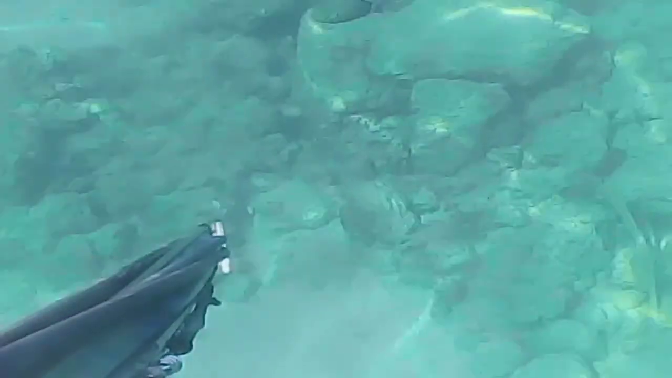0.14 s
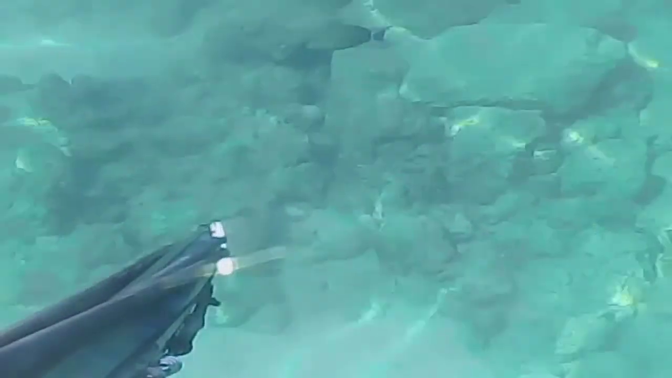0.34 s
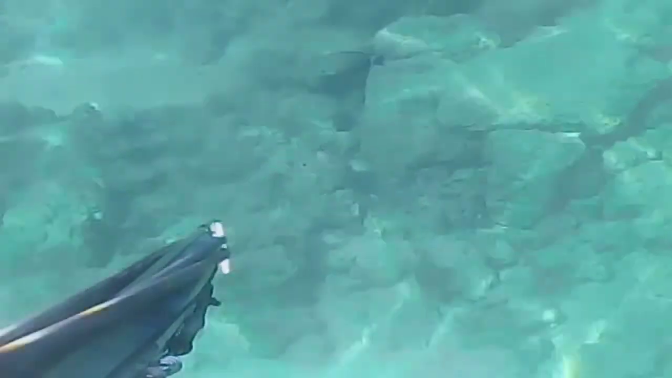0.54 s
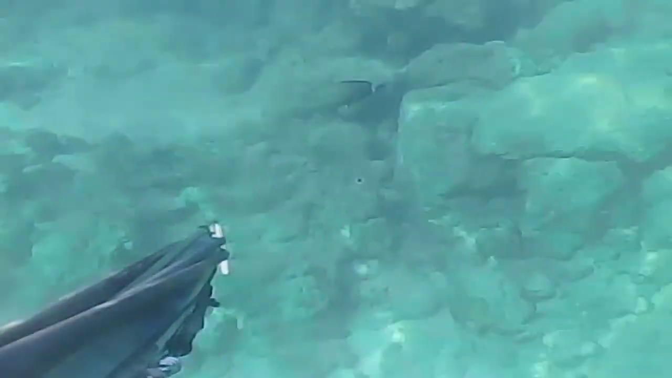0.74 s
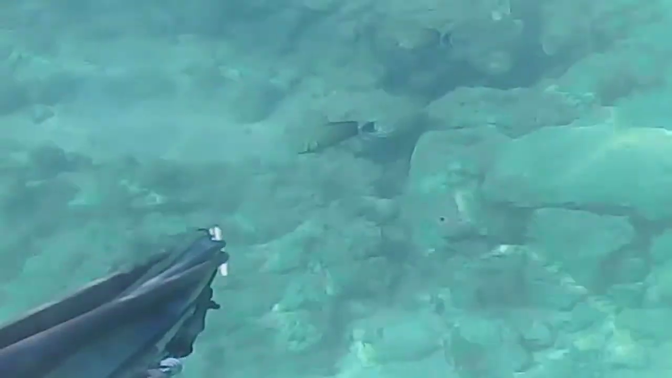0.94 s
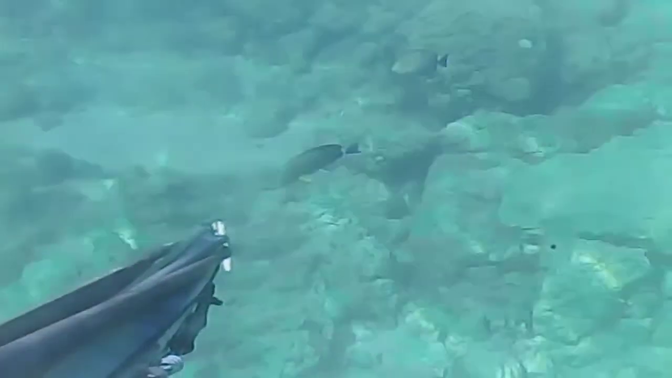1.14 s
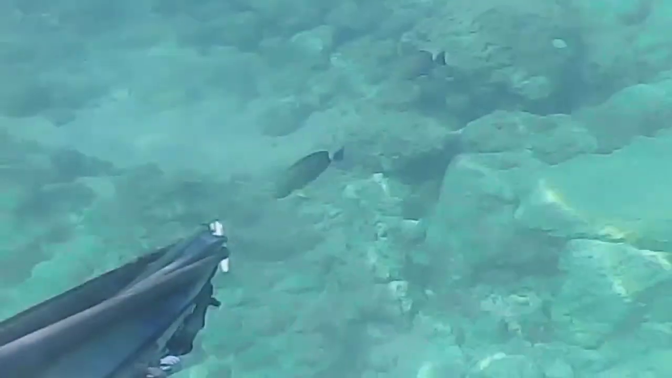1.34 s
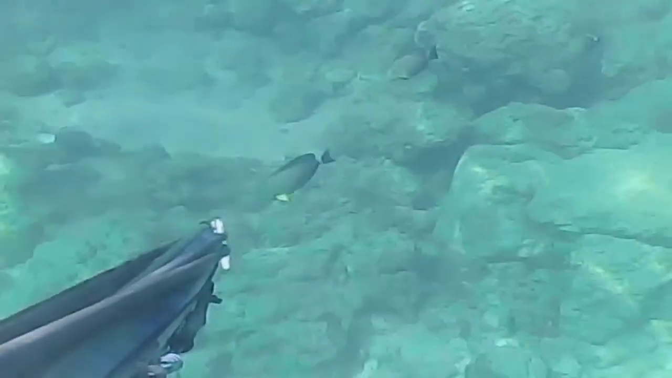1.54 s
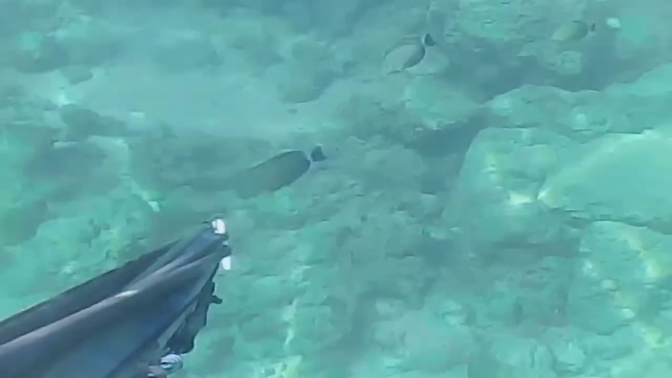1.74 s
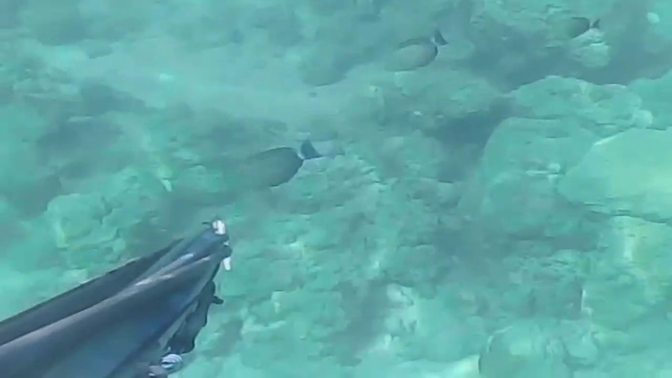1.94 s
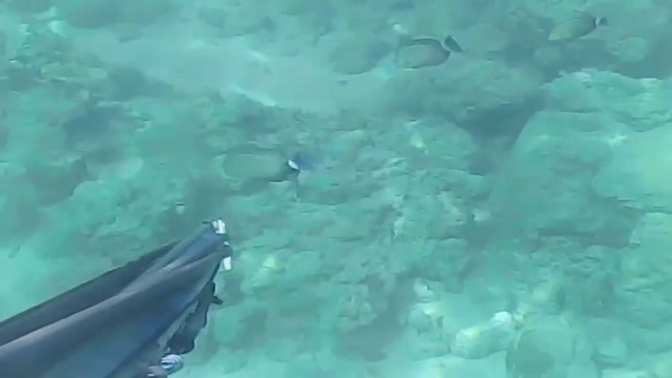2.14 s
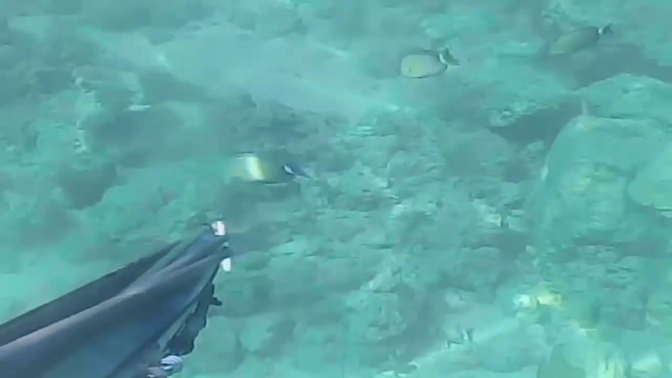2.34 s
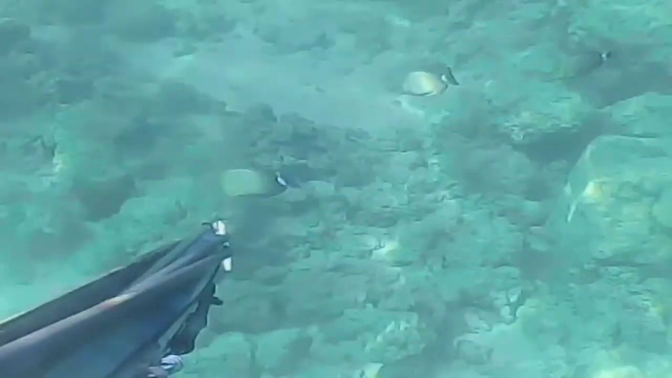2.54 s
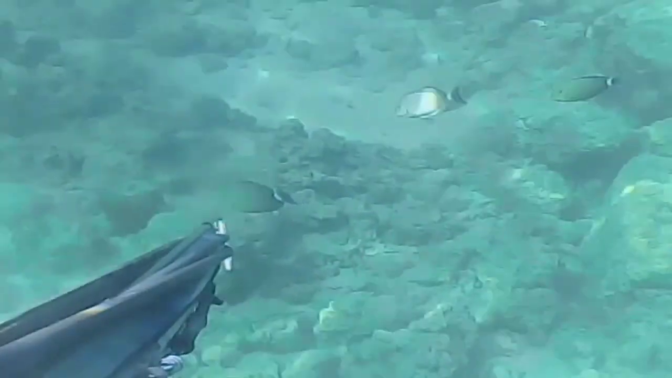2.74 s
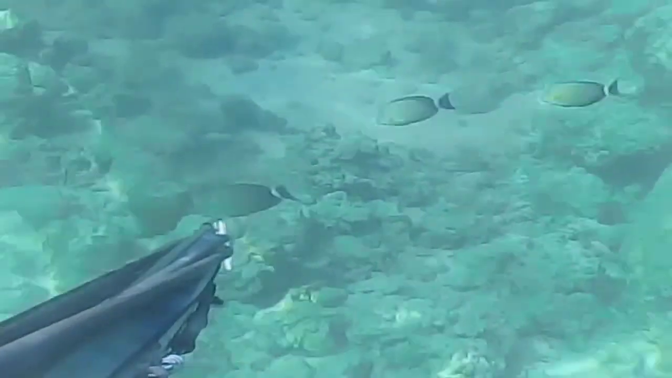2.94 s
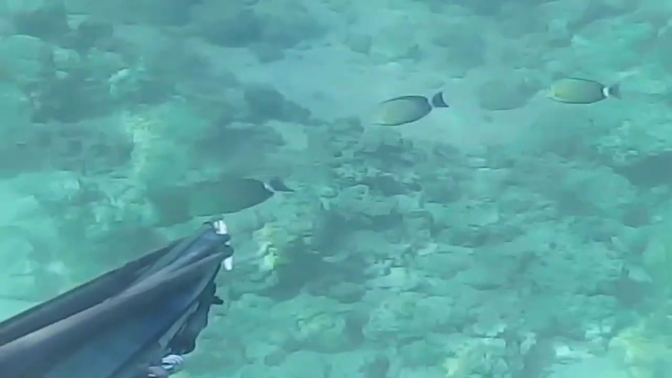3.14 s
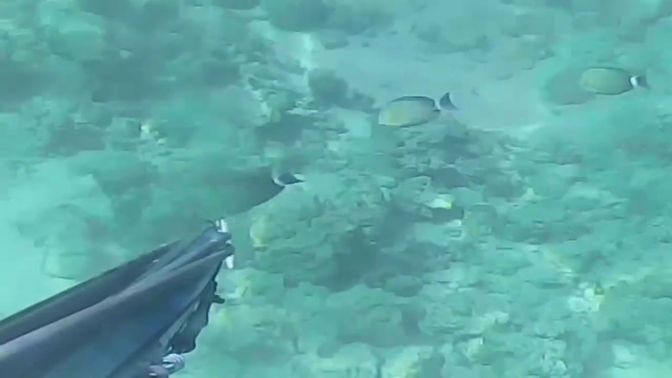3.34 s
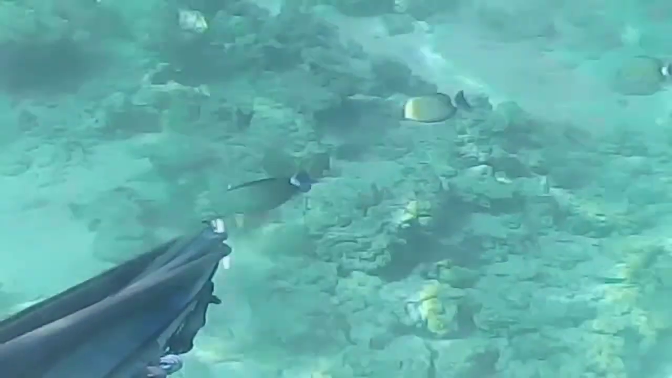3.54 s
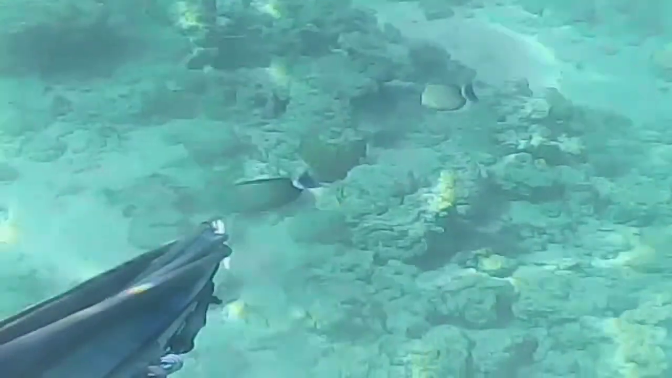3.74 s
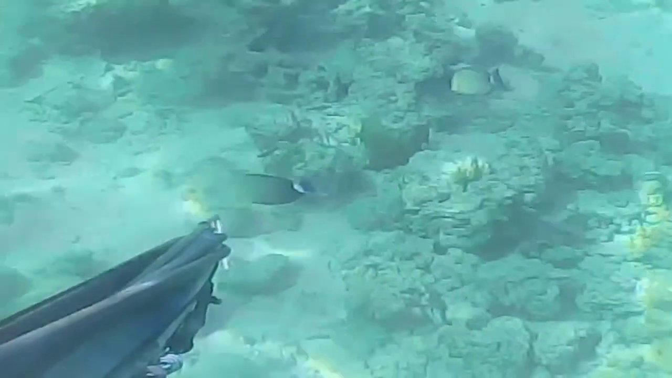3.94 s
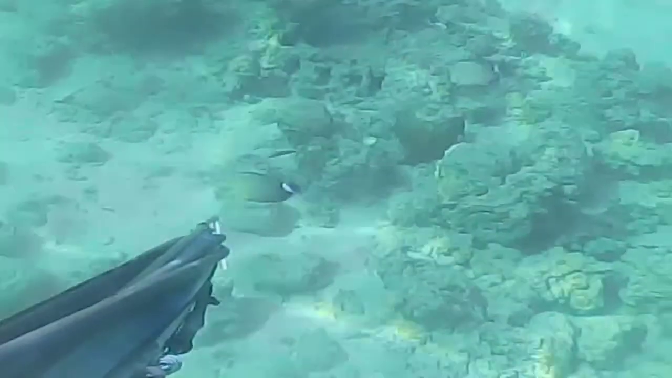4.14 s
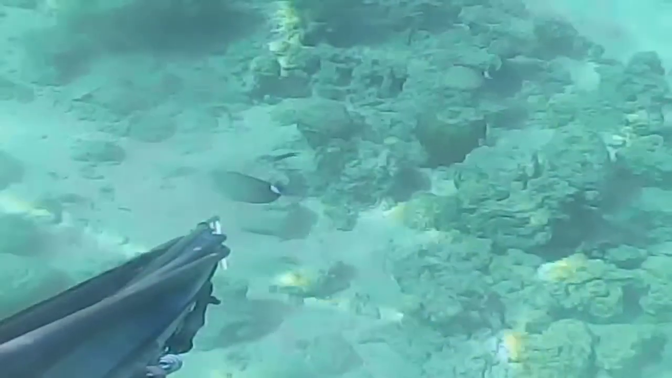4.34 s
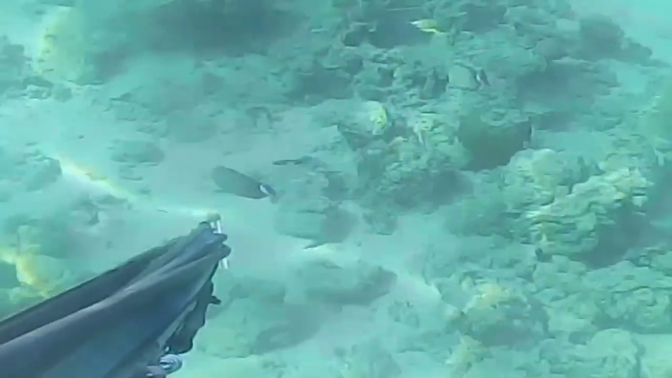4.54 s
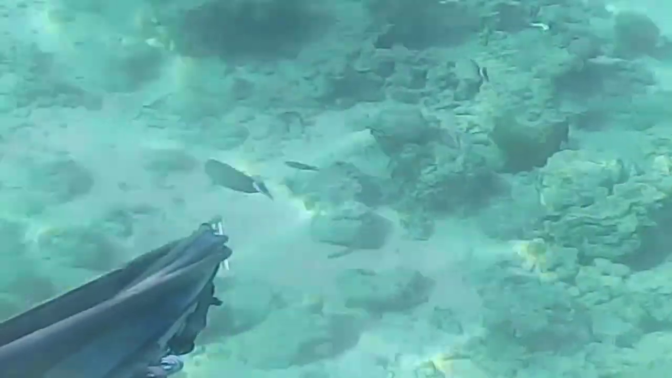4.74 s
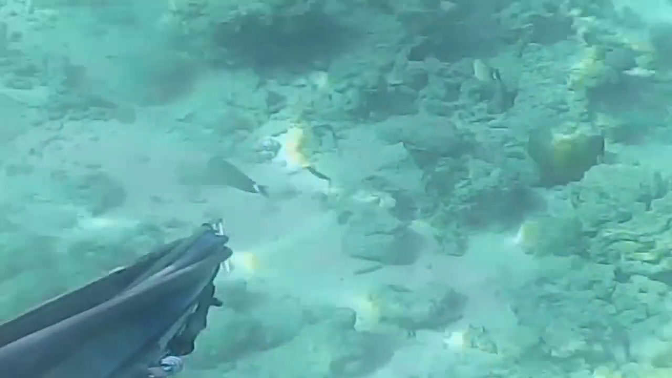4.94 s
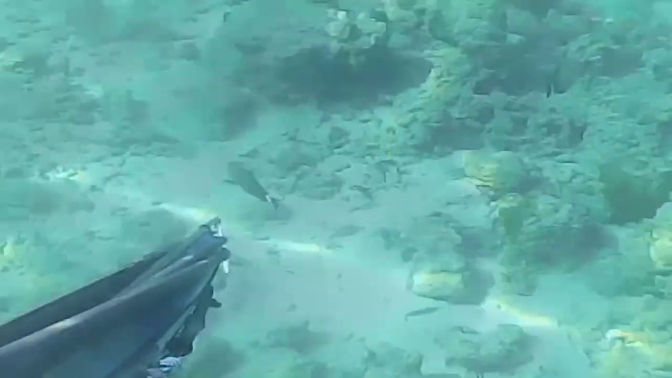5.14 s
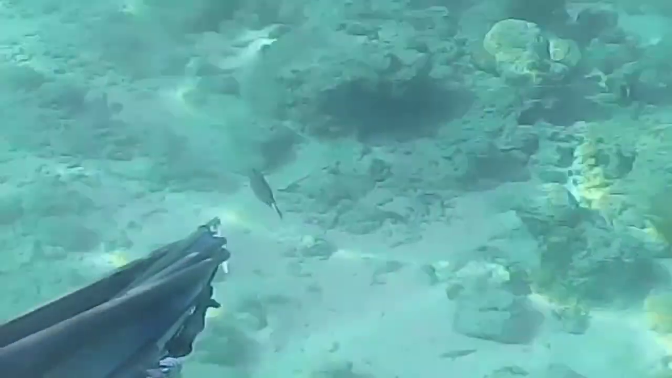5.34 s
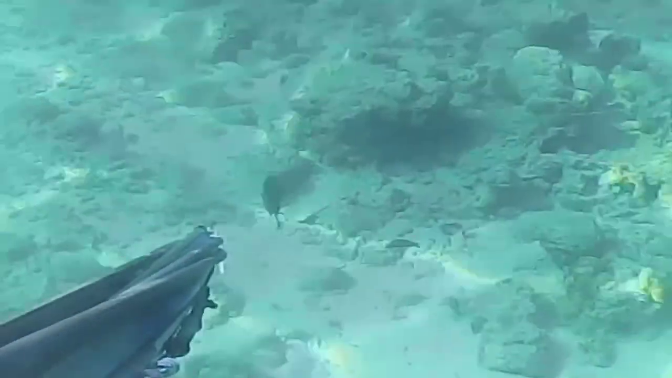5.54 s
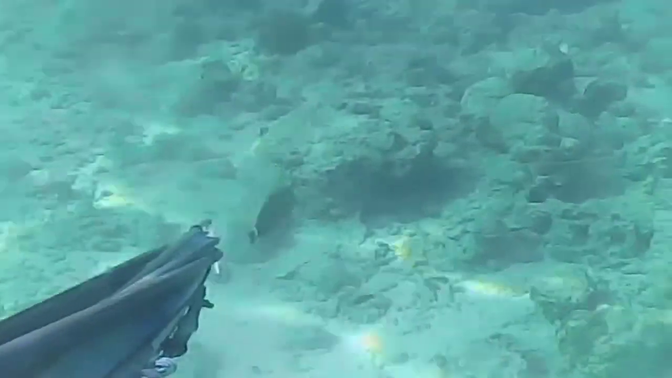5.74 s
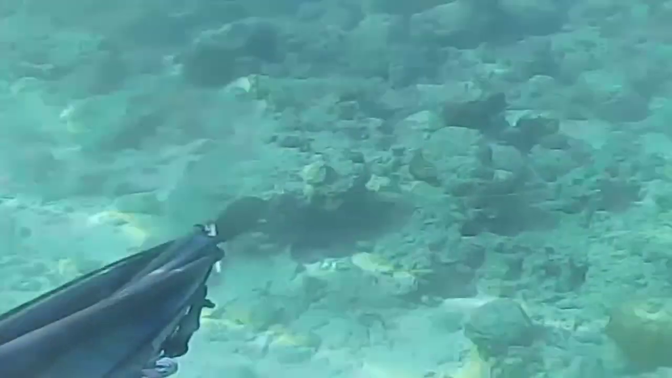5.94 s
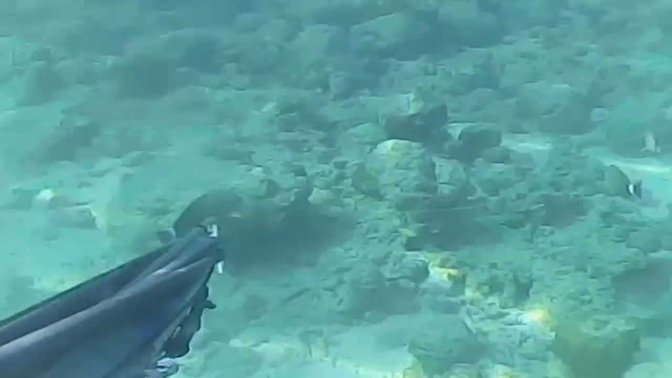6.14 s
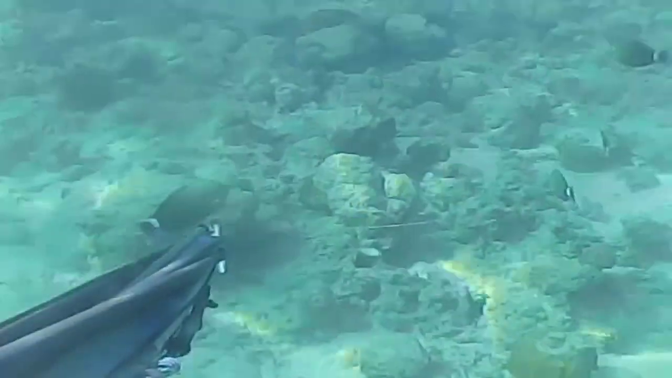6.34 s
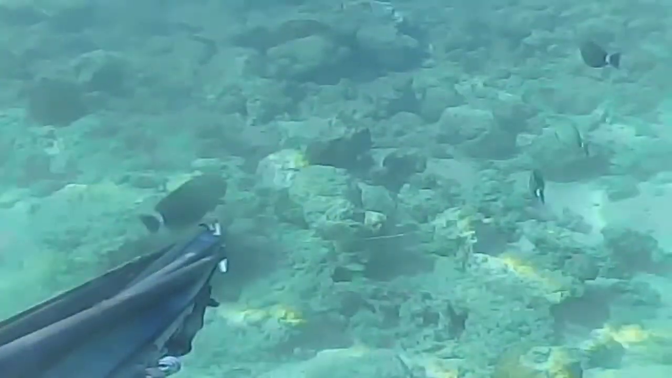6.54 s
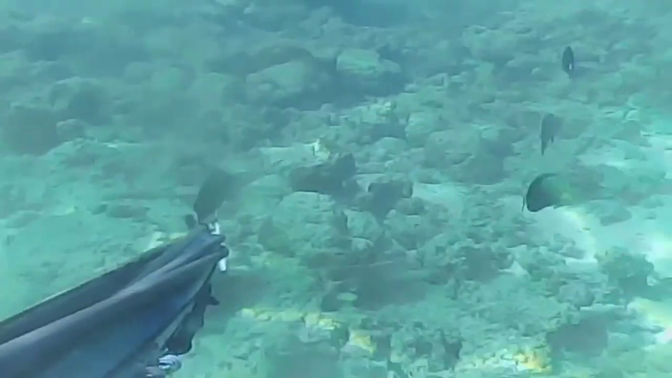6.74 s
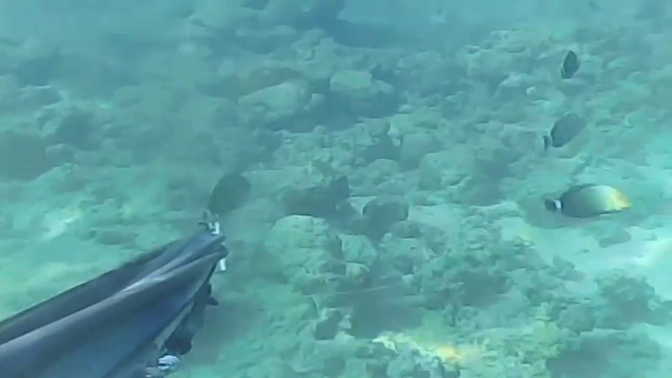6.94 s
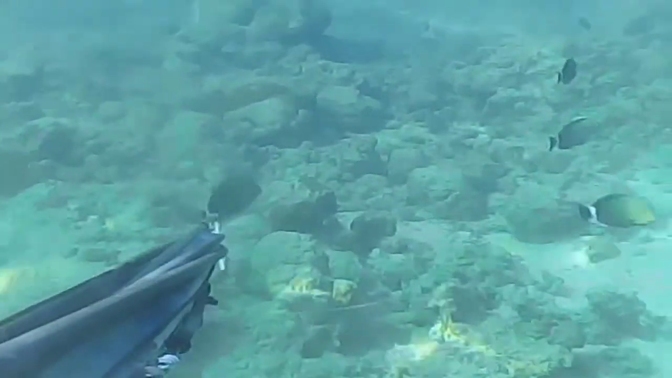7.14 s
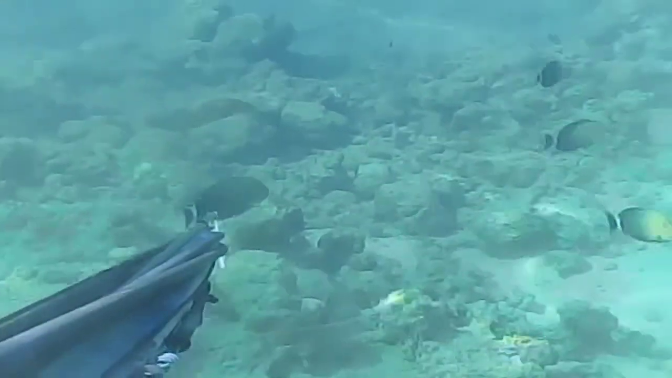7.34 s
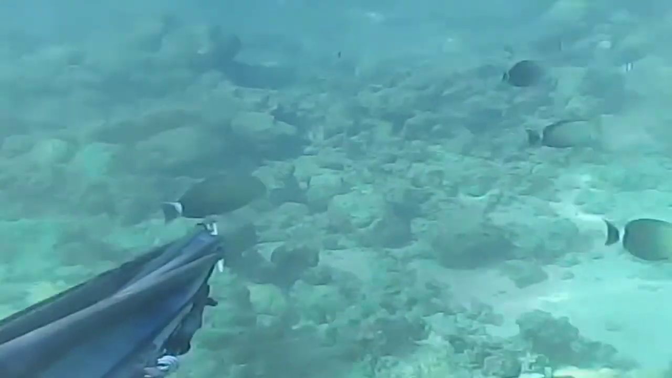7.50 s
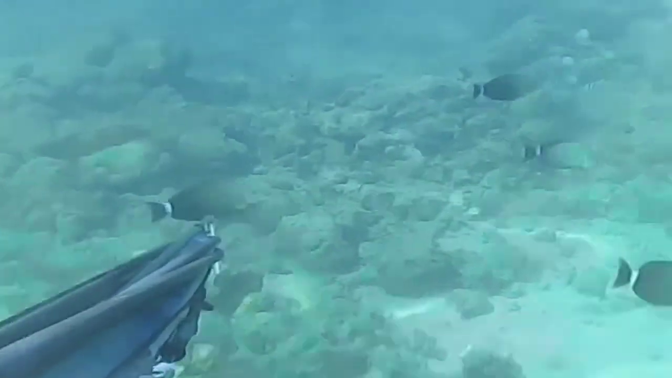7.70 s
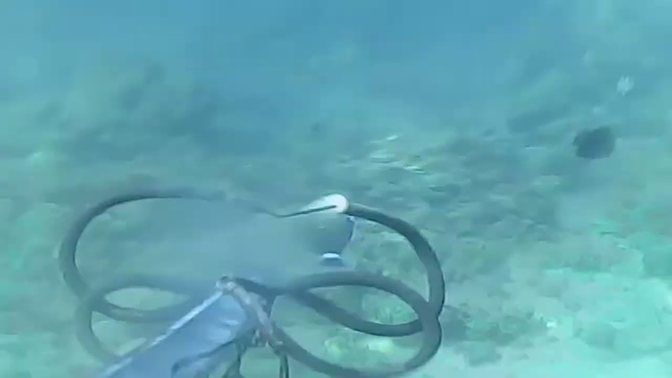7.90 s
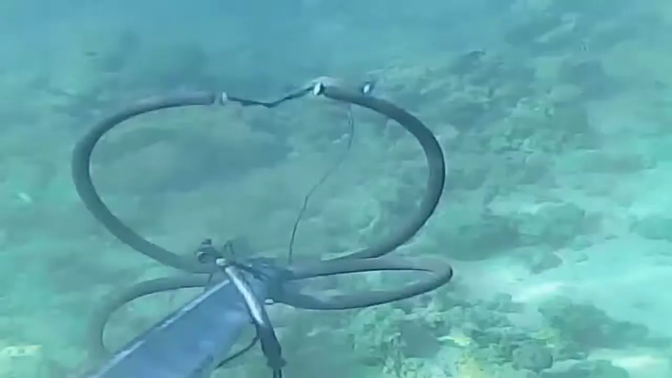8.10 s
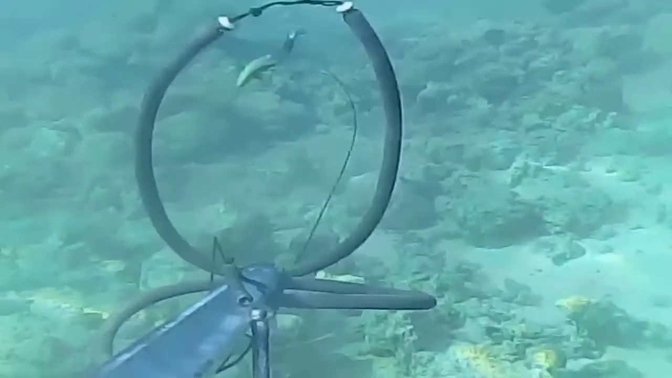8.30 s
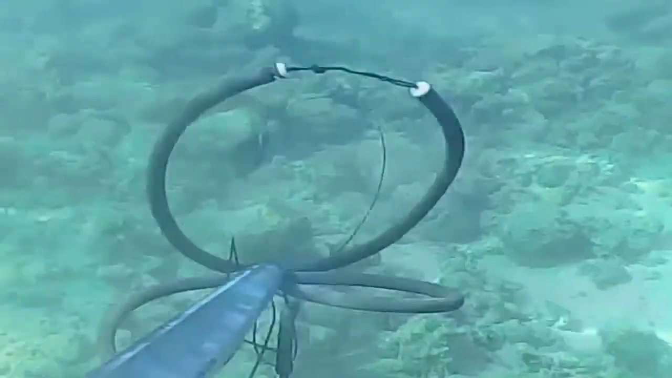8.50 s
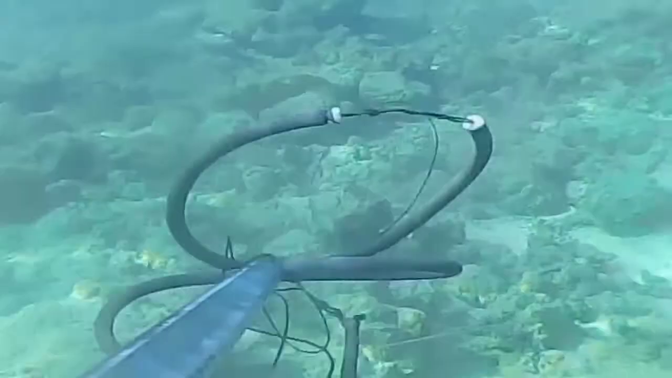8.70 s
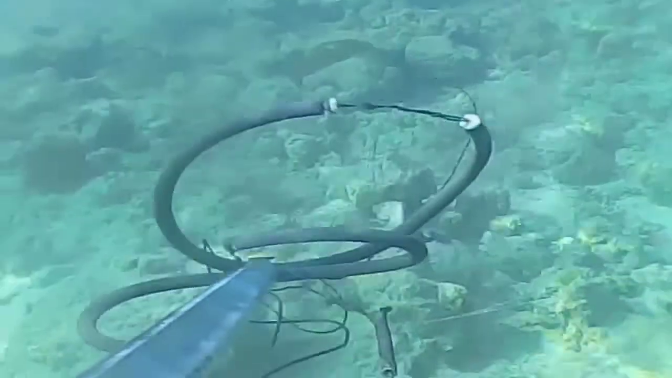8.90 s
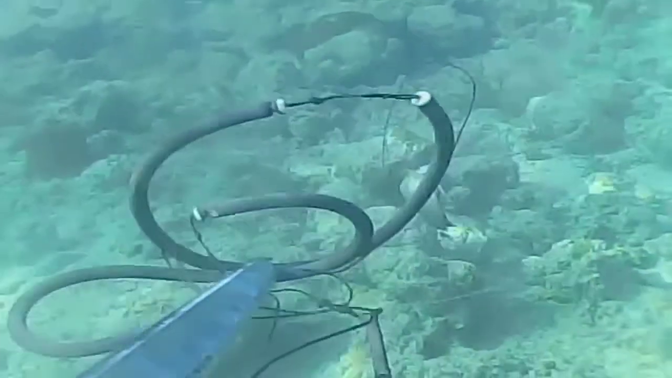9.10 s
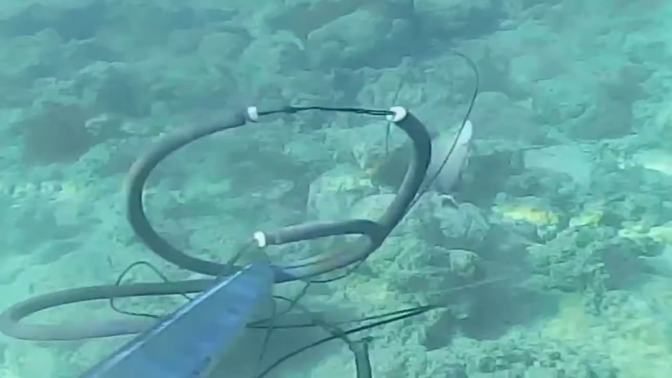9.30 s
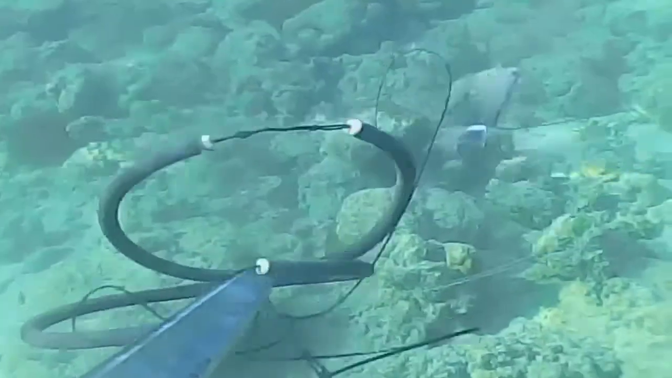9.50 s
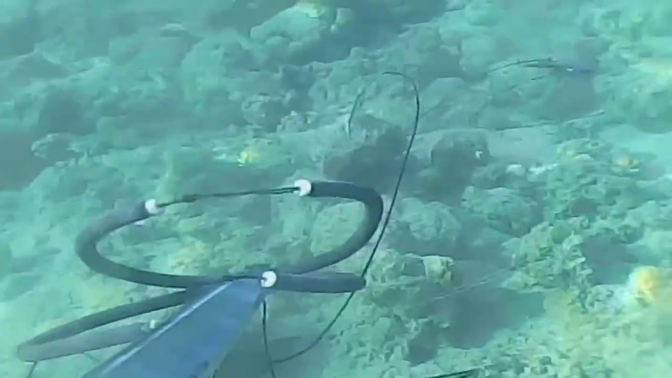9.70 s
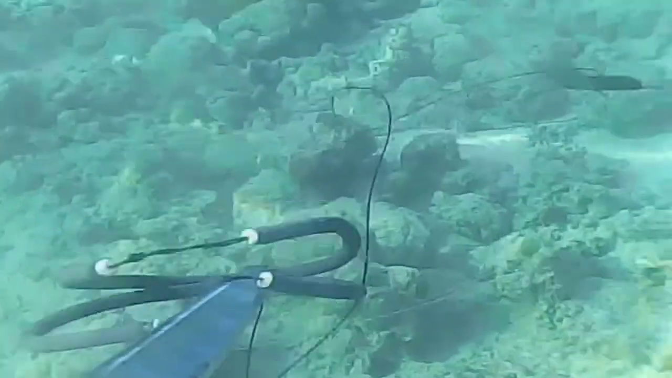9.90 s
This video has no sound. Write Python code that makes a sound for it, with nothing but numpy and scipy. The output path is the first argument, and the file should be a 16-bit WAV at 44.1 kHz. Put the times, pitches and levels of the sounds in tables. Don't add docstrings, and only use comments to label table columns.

```python
import sys
import numpy as np
from scipy import signal
from scipy.fft import rfft, irfft
from scipy.io import wavfile
from scipy.ndimage import map_coordinates

SR = 44100
rng = np.random.default_rng(int(sys.argv[2]) if len(sys.argv) > 2 else 0)


def gain_from_db(level_db):
    decades = np.asarray(level_db, float) / 20
    return 10 ** decades


def int16_out(signal):
    q = np.round(np.clip(np.atleast_2d(signal).T, -1, 1) * 32767)
    wavfile.write(sys.argv[1], SR, q.astype(np.int16))


N = 439236
T = np.arange(N) / SR

# [f/Hz, level/dB, t60/s]
BARREL_MODES = [(283.6, -17.5, 0.033), (385, -10, 0.039), (542.8, -0.5, 0.036), (653, -8.5, 0.051),
                (820, -13, 0.018), (1110, -12.5, .025), (1290, -15.5, 0.024), (1570, -18, 0.036),
                (1950, -17.5, .02), (2354, -16.5, .016), (2920, -21, 0.023)]
# [t/s, peak level/dB]
BLOWS = [(8.3668, -22.5), (8.3722, 17), (8.388, 3), (8.3948, 0), (8.4065, -2), (8.416, -5), (8.4236, -5.5),
         (8.434, -15.5), (8.445, -12), (8.458, -6), (8.472, -10), (8.488, -32), (8.506, -26.5),
         (8.521, -36), (8.644, -49), (8.66, -35.5)]
# [t/s, attack/s, hold/s, level/dB, release/(dB/s)]
RATTLE = [
    (8.33, 0.03, .002, -40, 907),
    (8.369, .004, 0.069, -10, 350),
    (8.5, 0.072, 0.2, -58, 254.5),
]
# [t/s, attack/s, hold/s, level/dB, release/(dB/s)]
RECOIL = [
    (8.385, 0.016, .068, -2, 1302),
    (8.44, .04, 0.025, -21, 89.5),
]
# [t/s, attack/s, hold/s, level/dB, release/(dB/s)]
WASH = [
    (8.372, .03, .06, -11, 302.5),
    (8.5, 0.061, 0.0092, -42.5, 48.5),
]
# [t/s, peak level/dB, f/Hz, brightness/dB, t60/s, body level/dB]
TRIGGER = (8.3445, -54, 1740, 10, .06, 16)
# [t/s, peak level/dB, f/Hz, brightness/dB]
SLAPS = [(8.4884, -24, 1558, -16), (8.5104, -40, 1420, -18.5), (8.5264, -40, 1420, -1.5),
         (8.531, -40.5, 1900, 0), (8.5464, -38.5, 1480, -13), (8.5657, -35, 1760, -9),
         (8.5844, -42, 1400, -11), (8.5914, -52, 2460, 7), (8.6015, -33, 1950, -2.5),
         (8.6115, -31.5, 1900, -3.5), (8.629, -41.5, 1930, -6), (8.6448, -31, 1520, -10),
         (8.6874, -41, 1966, -8), (8.696, -35, 2180, -9.5), (8.739, -53, 1860, -5),
         (8.7758, -39, 1880, -2.5), (8.8069, -40.5, 1870, -2), (8.8403, -51, 1670, -7),
         (8.981, -52, 1390, -10.5), (9.0892, -43.5, 1910, -9), (9.2015, -51, 1412, -4.5),
         (9.472, -54, 2000, -21), (9.4855, -44, 1510, -17.5), (9.907, -53.5, 1900, -12)]
# [t/s, peak level/dB, f/Hz, brightness/dB]
TICKS = [(0.591, -48, 1510, -13), (0.633, -56, 1490, -17), (1.2005, -48, 1910, -8.5),
         (1.2855, -48, 1850, -8), (1.5238, -47, 1960, -18), (1.5444, -57, 2030, -22),
         (1.6156, -53, 1560, -11), (1.78, -60, 1970, -4), (1.8357, -52.5, 1780, -7),
         (1.9713, -54, 1980, -13), (2.361, -65, 1420, 0), (2.88, -60, 1900, -5), (2.97, -61, 1900, -5),
         (3.0976, -64, 1740, 4), (3.1577, -49.5, 1690, -8.5), (3.34, -63, 1900, -4), (3.8, -62, 1880, -2),
         (4.208, -54, 1560, -7.5), (4.3171, -47.5, 2020, -13), (5.2894, -61, 1400, -6),
         (5.329, -50.5, 1600, -22), (5.6094, -62, 1930, -4), (5.7498, -52, 1570, -20),
         (5.9044, -64, 1490, -13), (6.0644, -60, 1990, -3), (6.6794, -58, 1890, -9),
         (7.6494, -54, 1580, -10)]
# (t60/s, body level/dB, body lost per dB of brightness/dB)
TICK_RULE, SLAP_RULE = (0.033, -19, 0.46), (0.034, -25.5, 1.26)
# [t/s, peak level/dB, f/Hz, t60/s]
KNOCKS = [(0.023, -46.5, 474, 0.089), (0.116, -63, 231, 0.058), (0.128, -56, 231, 0.039),
          (0.592, -34.5, 273, 0.08), (0.611, -37.5, 263, 0.084), (0.632, -40, 380, 0.026),
          (1.599, -40.5, 287, 0.088), (1.692, -35, 480, 0.044), (2.729, -52, 584, 0.036),
          (4.431, -43, 244, 0.096), (5.219, -40, 292, 0.047), (5.325, -54, 231, 0.06),
          (5.748, -50, 237, 0.05), (8.643, -56.5, 222, 0.05), (8.65, -34.5, 556, 0.11),
          (9.059, -23, 305, 0.048), (9.078, -34.5, 440.5, 0.035), (9.469, -41, 566, 0.035)]
# [t/s, f/Hz, t60/s, level/dB, direction/sign]
ROCKING = [
    (.598, 74, .35, -47, 1),
    (1.515, 22.5, .9, -41, -1),
    (1.5, 75, .5, -53, 1),
    (8.435, 70, .3, -13, 1),
    (8.5305, 55, .28, -21, 1),
    (9.05, 110, .15, -44, 1),
]
# [t/s, length/s, start f/Hz, end f/Hz, level/dB]
BUBBLES = [
    (6.117, .015, 1410, 1450, -55),
    (6.133, .019, 1450, 1520, -54),
    (.112, .012, 1050, 1300, -62),
    (.128, .011, 1050, 1350, -63),
    (.008, .02, 1500, 1000, -61),
]
# [t/s, attack/s, hold/s, level/dB, release/(dB/s)]
RUBBING = [
    (-.01, 0.0075, .005, -55.5, 240),
    (.03, 0.027, 0.057, -77, 400),
    (.588, .004, .001, -46, 570),
    (.62, 0.017, .001, -54, 600),
    (1.45, 0.083, .001, -50.5, 330),
    (1.5, 0.061, 0.11, -66, 595),
    (1.68, 0.017, 0.0013, -53, 1100),
    (9.44, 0.035, 0.014, -62, 1003),
]
# [t/s, firing rate f/Hz]
FIRING_RATE = [(0, 157.75), (2, 157.8), (5.4, 157.82), (6.1, 157.6), (7, 157.13), (8, 156.85),
               (8.5, 156.76), (9.96, 156.73)]
# [place in cycle/0-1, level/dB]
BEATS = [(0.0, 0), (0.082, -1.3), (0.171, 1.5), (0.255, 1.5), (0.335, -5.5), (0.41, -3), (0.491, -0.5),
         (0.587, -1), (0.673, 5.5), (0.754, 2.5), (0.831, 0.9), (0.909, 3)]
CLATTER_DB = [0.5, 1.5, -3.5, 3, -0.5, -0.5, 0.5, 1, 0.5, 0, -2.5, 1]
# [t/s, hum level/dB]
APPROACH = [(0, -54.5), (.4, -55.5), (1.9, -49.5), (3.3, -47), (4.5, -45), (7.1, -44), (9.96, -44.5)]
# [multiple of cycle rate, level under the hum/dB]
LOW_ORDERS = [(1, -28), (2, -27.5), (4, -25), (6, -18.5), (7, -24.5), (16, -24), (17, -28.5), (18, -29),
              (20, -26.5)]
# [multiple of cycle rate, level/dB]
DRONE_ORDERS = [(25, -15.5), (27, -15), (30, -22), (34, -9), (38, -15), (40, -16), (42, -18), (43, -14),
                (45, -6.5), (46, -10), (47, -16), (48, -12)]
# [f/Hz, width/Hz, level/dB]
HULL = [(460, 75, -66), (608, 65, -65), (964.6, 35, -74), (1286, 110, -72.5), (1560, 440, -82),
        (1900, 71, -79), (2280, 90, -90.5), (2790, 300, -88.5)]
# [f/Hz, level per Hz/dB]
SEA_SPECTRUM = [(120, -35.5), (200, -6.5), (300, -17), (513, -16.5), (595, -10.5), (807, -34), (958, -22.5),
                (1110, -28.5), (1300, -26), (1930, -25.5), (2230, -38.5), (3070, -35), (3730, -49.5),
                (4850, -81), (8210, -120)]
# [t/s, level/dB]
SURGE = [(0, -66), (2.4, -62.5), (3.3, -60), (5.2, -56), (6.3, -64.5), (6.6, -53.5), (7.7, -54),
         (8.0, -61.5), (8.9, -49), (9.96, -58.5)]

RECOIL_S = 8.388
REST_HZ, EXTRA_HZ, STIFF_S, SAG_S = 19.0, 21.0, 0.010, 0.060
RISE_DB = 28.5
SOFTENING_DB = 70.5
FIRST_FIRING = 0.25
DRONE_DB, DRONE_FOLLOWS = -59, 0.6
SEA_DB = -63
RUMBLE_DB, RUMBLE_FOLLOWS = -60, 0.28
CEILING, OFFSET = 0.69, -0.0013
CUT_HZ, CONVERTER_TOP = 4500, 0.72


def rms_one(x):
    return x / np.sqrt(np.mean(x ** 2) + 1e-20)


def in_time(rows):
    s, *columns = np.transpose(rows)
    return [np.interp(T, s, c) for c in columns]


def band(x, low_hz, high_hz):
    edges = [low_hz, min(high_hz, 0.45 * SR)]
    return signal.sosfilt(signal.butter(2, edges, "band", fs=SR, output="sos"), x)


def drift(rate):
    knots = rng.standard_normal(400)
    return map_coordinates(knots, [T * rate % 399], order=3)


def ring(clicks, hz, t60):
    r, w = gain_from_db(-60 / (t60 * SR)), 2 * np.pi * hz / SR
    return signal.lfilter([0, np.sin(w)], [1, -2 * r * np.cos(w), r * r], clicks + 1e-18)


def decaying(hz, t60):
    t = np.arange(int(1.5 * t60 * SR)) / SR
    return np.sin(2 * np.pi * hz * t) * gain_from_db(-60 * t / t60)


def add(out, s, piece):
    i = int(s * SR)
    out[i:i + len(piece)] += piece[:N - i]


def strokes(rows):
    gain = 0
    for s, attack, hold, db, fall in rows:
        times = np.cumsum([s - 0.001, 0.001, max(attack, 0.001), max(hold, 0.001), 1])
        gain = gain + gain_from_db(np.interp(T, times, [-200, db - RISE_DB, db, db, db - fall]))
    return gain


def barrel():
    out, first, size = np.zeros(N), int(8.3 * SR), SR
    part = slice(first, first + size)
    rattle = strokes(RATTLE)[part]
    since_recoil = np.clip(T[part] - RECOIL_S, 0, 0.15)
    at = [int(s * SR) - first for s, db in BLOWS]
    blow_db = np.array(BLOWS)[:, 1]
    for hz, level_db, t60 in BARREL_MODES:
        octaves = max(np.log2(hz / 700), 0)
        duller = gain_from_db(-SOFTENING_DB * octaves * since_recoil)
        hits = (rng.random(size) < 900 / SR) * rng.standard_normal(size)
        clicks = rattle * duller * hits
        clicks[at] += gain_from_db(blow_db + rng.normal(0, 3, len(at)))
        out[part] += gain_from_db(level_db) * ring(clicks, hz, t60)
    return out


def recoil():
    alive = T > RECOIL_S
    hz = REST_HZ + EXTRA_HZ * np.exp(-np.maximum(T - RECOIL_S - STIFF_S, 0) / SAG_S)
    cycles = np.cumsum(hz * alive) / SR - 0.3
    return alive * strokes(RECOIL) * np.sin(2 * np.pi * cycles)


def wash():
    return strokes(WASH) * rms_one(band(rng.standard_normal(N), 41, 150))


def contact_rows(rows, rule):
    t60, body_db, loss = rule
    return [(s, db, hz, bright_db, t60, body_db - loss * bright_db) for s, db, hz, bright_db in rows]


def light_contacts():
    out = np.zeros(N)
    rows = [TRIGGER] + contact_rows(SLAPS, SLAP_RULE) + contact_rows(TICKS, TICK_RULE)
    for s, db, hz, bright_db, t60, body_db in rows:
        white = rng.standard_normal(4000)
        fade = gain_from_db(-60 * np.arange(white.size) / SR / t60)
        spray = 0.59 * rms_one(ring(white, hz, 0.0097))
        spray += gain_from_db(bright_db + 3.0) * rms_one(band(white, 2300, 8500))
        spray += gain_from_db(body_db - 3.5) * rms_one(band(white, 700, 1200))
        add(out, s, gain_from_db(db - 0.5) * spray * fade)
    return out


def knocks():
    out = np.zeros(N)
    for s, db, hz, t60 in KNOCKS:
        knock = decaying(hz, t60)
        onset = np.minimum(np.arange(len(knock)) * hz / SR, 1)
        add(out, s - 0.002, gain_from_db(db + 0.5) * knock * onset)
    return out


def rocking():
    out = np.zeros(N)
    for s, hz, t60, db, direction in ROCKING:
        add(out, s, direction * gain_from_db(db) * decaying(hz, t60))
    return out


def rubbing():
    slips = (rng.random(N) < 700 / SR) * rng.standard_normal(N)
    wall = 0.39 * rms_one(band(slips, 300, 1270)) + rms_one(ring(slips, 618, 0.025))
    return strokes(RUBBING) * wall


def bubbles():
    out = np.zeros(N)
    for s, length, start_hz, end_hz, db in BUBBLES:
        glide = np.linspace(start_hz, end_hz, int(length * SR))
        chirp = np.sin(2 * np.pi * np.cumsum(glide) / SR)
        add(out, s, gain_from_db(db) * chirp * signal.windows.tukey(len(glide), 0.4))
    return out


def order_lines(orders, cycle, wander_db, rate):
    lines = 0
    for k, db in orders:
        line = np.cos(2 * np.pi * (k * cycle + rng.random()))
        lines = lines + gain_from_db(db + wander_db * drift(rate)) * line
    return lines


def engine():
    firing_hz, = in_time(FIRING_RATE)
    cycle = (FIRST_FIRING + np.cumsum(firing_hz) / SR) / 12
    hum_db, = in_time(APPROACH)
    drone_db = DRONE_DB + DRONE_FOLLOWS * (hum_db - hum_db.max())

    place, strength_db = np.transpose(BEATS)
    beat = np.interp(cycle % 1, np.append(place, 1), np.arange(13))
    strength = gain_from_db(np.interp(cycle, place, strength_db, period=1) + 0.38 * drift(19))
    hum = band(strength * np.cos(2 * np.pi * beat), 97, 210)
    hum += order_lines(LOW_ORDERS, cycle, 1.2, 2.7)

    drone = order_lines(DRONE_ORDERS, cycle, 2.8, 2.1)
    drone *= gain_from_db(np.cos(2 * np.pi * (cycle - 0.95)))

    gate = gain_from_db(2.6 * np.interp(cycle, place, CLATTER_DB, period=1))
    gated = gate * rng.standard_normal((2, N))
    clatter = np.zeros(N)
    for k, (hz, width, db) in enumerate(HULL):
        clatter += gain_from_db(db) * rms_one(ring(gated[k % 2], hz, 2.6 / width))
    tones = np.sqrt(2) * (gain_from_db(hum_db) * hum + gain_from_db(drone_db) * drone)
    return tones + gain_from_db(0.5 * (drone_db + 58.0)) * clatter


def reef():
    crackle = (rng.random(N) < 60 / SR) * rng.exponential(6, N) * rng.choice([-1, 1], N)
    hz = np.maximum(np.fft.rfftfreq(N, 1 / SR), 1)
    spectrum_hz, spectrum_db = np.transpose(SEA_SPECTRUM)
    colour = gain_from_db(np.interp(np.log(hz), np.log(spectrum_hz), spectrum_db))
    hiss = irfft(rfft(rng.standard_normal(N) + crackle) * colour, N)
    return gain_from_db(SEA_DB) * rms_one(hiss)


def surge():
    swell_db, = in_time(SURGE)
    rumble_db = RUMBLE_DB + RUMBLE_FOLLOWS * (swell_db - swell_db.mean())
    swell = rms_one(band(band(rng.standard_normal(N), 16, 24), 13, 39))
    rumble = rms_one(band(rng.standard_normal(N), 50, 190))
    return gain_from_db(swell_db - 0.5) * swell + gain_from_db(rumble_db) * rumble


def scene():
    shot = barrel() + recoil() + wash()
    handling = light_contacts() + knocks() + rocking() + rubbing()
    water = bubbles() + engine() + reef() + surge()
    return (shot + handling + water)[None]


def low_pass(x):
    return signal.sosfilt(signal.butter(12, 16000, fs=SR, output="sos"), x)


def record(dry):
    clipped = CEILING * dry / (CEILING ** 6 + np.abs(dry) ** 6) ** (1 / 6)
    low = signal.sosfiltfilt(signal.cheby2(8, 40, CUT_HZ, fs=SR, output="sos"), clipped)
    top = CONVERTER_TOP * low / (CONVERTER_TOP ** 40 + np.abs(low) ** 40) ** (1 / 40)
    noise_floor = gain_from_db(-99) * rng.standard_normal(N)
    return low_pass(top + OFFSET + noise_floor)


dry = scene()
out = record(dry)
int16_out(out)
```